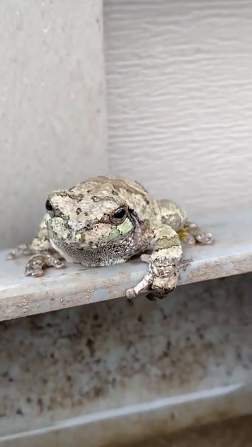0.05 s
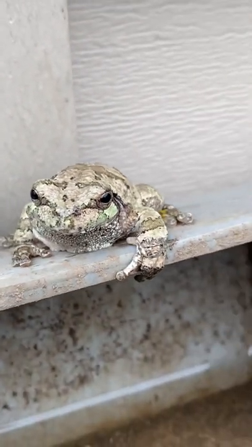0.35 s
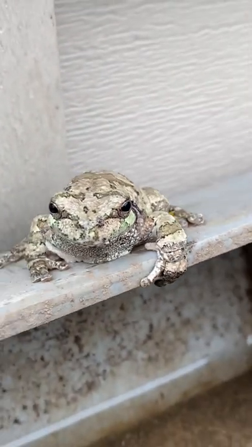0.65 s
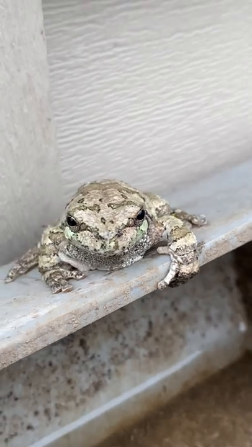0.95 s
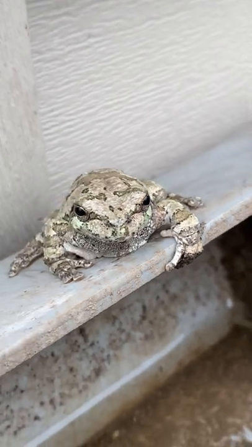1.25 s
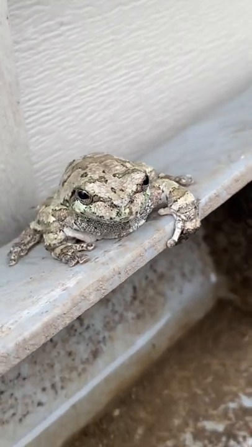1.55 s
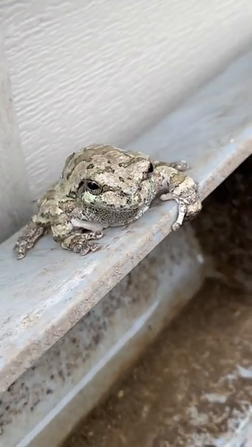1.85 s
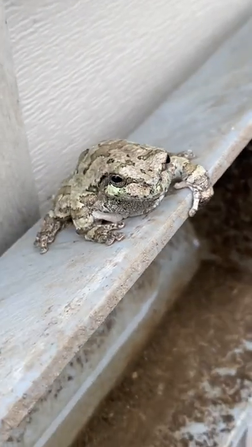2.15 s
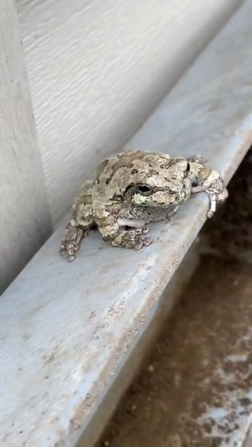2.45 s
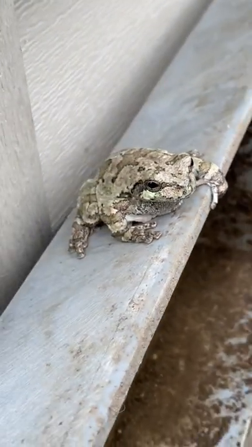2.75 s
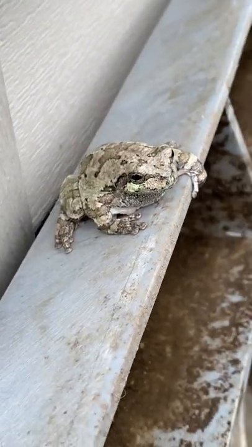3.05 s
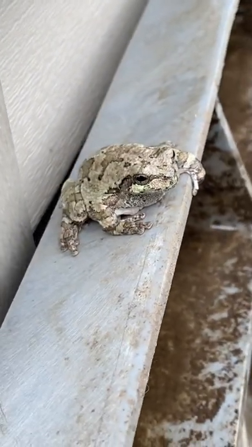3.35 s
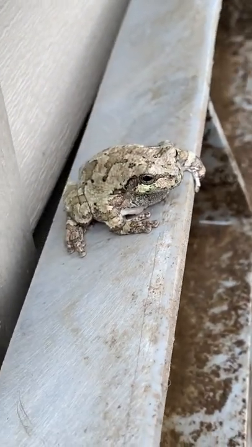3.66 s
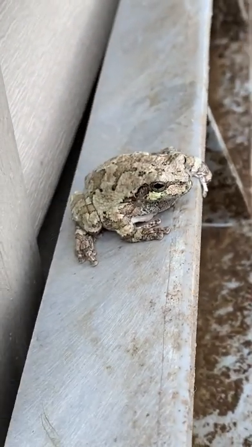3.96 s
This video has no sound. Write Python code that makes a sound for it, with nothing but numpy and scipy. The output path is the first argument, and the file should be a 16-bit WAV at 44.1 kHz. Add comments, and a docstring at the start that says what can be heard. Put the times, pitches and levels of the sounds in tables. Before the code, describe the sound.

Rapid bird chirps and whistles over low rumble and light wind, then faint cloth rustling.

```python
"""Outdoors beside a house wall, over a steady low rumble and light wind. A small bird opens with a rapid
trill of falling chirps, then alternates arched slurs with high whistles, all gliding sine tones that
bounce off nearby surfaces. Farther birds call behind the trill, with faint ticks close by. After about a
second the song ends, leaving distant calls and twitter. A soft, clothing-like rustle at the microphone
swells to one firm rub near 1.7 s and fades around 3 s; a few small taps and a tick follow."""
import sys
import numpy as np
from scipy import signal
from scipy.fft import rfft, irfft, next_fast_len
from scipy.io import wavfile
from scipy.ndimage import uniform_filter1d, map_coordinates

SR = 44100
rng = np.random.default_rng(int(sys.argv[2]) if len(sys.argv) > 2 else 0)


def output_pcm(signal):
    """Save a mono or channel-first signal as 16-bit PCM at the path in sys.argv[1].

    Samples are clipped to [-1, 1] before scaling.
    """
    pcm = np.clip(np.atleast_2d(signal).T, -1, 1) * 32767
    wavfile.write(sys.argv[1], SR, np.round(pcm).astype(np.int16))


N = 176400
PREROLL = SR // 4  # samples ahead of the start, so the first chirp can begin early

# Levels in the tables are relative; each layer sets its own trim.
# chirps of the trill (time of peak [s], level [dB])
TRILL_CUES = [(.002, -44.5), (.075, -45.5), (0.1463, -45.5), (0.219, -45), (.29, -44.5), (.36, -44),
              (.432, -45), (.506, -46), (0.5828, -46.5)]
# one chirp, a steep fall and a separate low tail (time [ms], pitch [ratio to loudest point], level [dB])
CHIRP_SHAPE = [(0, 1.24, -26), (7.44, 1.28, -17), (11.2, 1.13, -11), (15.52, 1, 0), (19.33, .85, -8.5),
               (25.8, .77, -33), (32.2, .715, -12), (39.1, .71, -15.5), (44.9, 0.656, -11.5)]
# arched slurs (time [s], length [s], level [dB], top pitch [Hz])
SLUR_CUES = [(0.645, 0.073, -56.5, 3705), (0.792, 0.066, -56, 3640), (0.941, 0.063, -56, 3580)]
# one slur, an arch that breaks at the top (position [0-1], pitch [ratio to top], level [dB])
SLUR_SHAPE = [(0, 0.95, -4.5), (.16, .87, -1), (.36, 0.91, 1.5), (.6, 1, -15), (.78, 1, -2.5), (1, 0.76, 0)]
# high whistles after the slurs (time [s], length [s], level [dB], pitch [Hz])
WHISTLE_CUES = [(0.73, 0.039, -54, 4707), (0.873, 0.048, -60, 4580), (1.02, 0.0407, -57, 4340)]
# one whistle (position [0-1], pitch [ratio], level [dB])
WHISTLE_SHAPE = [(0, 0.91, -20.5), (.33, 1, -6), (.46, 0.98, 5), (1, 1, -4)]
# early reflections of the song off nearby surfaces (delay [ms], level [dB])
REFLECTIONS = [(2.2, -18), (5.9, -5), (15.5, -13), (36, -10.5)]
# steady calls of farther birds (time [s], length [s], level [dB], pitch [Hz])
FAR_CUES = [(0, 0.17, -63, 2507), (0.193, .055, -68, 2050), (1.658, 0.12, -74, 3010),
            (2.338, 0.05, -74.5, 2775), (2.63, 0.11, -76.5, 2490), (2.928, 0.12, -74, 2630),
            (3.263, 0.21, -84, 3770)]
# bouts of very distant twitter (start [s], end [s], level [dB], top pitch [Hz])
TWITTER_BOUTS = [(1.049, 1.7, -79.5, 3310), (2.028, 2.58, -82.5, 5000), (2.049, 3.1, -79.5, 2780),
                 (3.682, 4.0, -85, 3550)]
# fader moves of the rustle (time [s], body level [dB], treble level [dB])
RUSTLE_FADERS = [(0, -84, -84), (.3, -86.5, -89), (.7, -79, -80), (1.3, -81.5, -90), (1.45, -79, -81.5),
                 (1.58, -88.5, -103), (1.72, -77, -93.5), (1.86, -70, -80), (1.97, -75, -97),
                 (2.3, -74.5, -100), (2.85, -77, -102), (2.93, -84, -104), (4, -106, -103)]
# colours of the cloth's body, its treble and the hollow firm rub (frequency [Hz], level [dB])
BODY_EQ = [(130, -43), (450, 5), (1150, 4), (1700, 0), (2500, 1.5), (3600, -10), (6500, -27.5)]
TREBLE_EQ = [(2000, -2.5), (4500, 0), (11000, 3.5), (13500, -15)]
RUB_EQ = [(300, -5.5), (980, 6.5), (1400, -10), (1800, 2), (2600, -12.5), (4400, -10), (6500, -31)]
# crisp close ticks and duller handling taps (time [s], level [dB])
TICK_CUES = [(.103, -63.5), (.133, -67), (.168, -69.5), (.345, -67.5), (.429, -70), (.506, -72),
             (.765, -79), (.898, -78), (3.851, -78.5)]
TAP_CUES = [(1.698, -63.5), (1.836, -57), (2.803, -69), (2.978, -63), (3.688, -74.5), (3.934, -69.5)]
# soft low handling bumps (time [s], level [dB], centre [Hz])
BUMP_CUES = [(.42, -56.5, 155), (1.412, -57, 128)]
# colours of the rumble and the wind (frequency [Hz], level [dB])
RUMBLE_EQ = [(15, -50.5), (26, -19.5), (48, -1.5), (72, -0.5), (155, -13.5), (215, -21.5), (600, -38.5),
             (1200, -68)]
WIND_EQ = [(150, -26.5), (700, 6.5), (3500, -1.5), (7000, -9), (13500, -9.5)]
# stereo image of the rumble, and of wind and cloth (frequency [Hz], left-right correlation [-1 to 1])
RUMBLE_IMAGE = [(70, .9997), (125, .98), (250, .72), (500, .1)]
AIRY_IMAGE = [(500, -0.35), (1100, -0.32), (2500, 1), (10000, 0.6)]
# the microphone's treble notch (frequency [Hz], gain [dB])
MIC_EQ = [(5700, 0), (6400, -6), (7000, -21.5), (7700, -18), (8700, -1)]


def songbird():
    """The lead voice: direct song, slaps off nearby surfaces, and a short and a long yard reverb."""
    song = trill() + np.pad(flourish(), (PREROLL, 0))
    close = np.array([song, song])
    for ms, db in REFLECTIONS:
        add(close, ms / 1000, amp(db) * song)
    short_tail = amp(-9.5) * yard(song, t60=.29, width=.29)
    long_tail = amp(-11) * yard(song, t60=.96, width=.16)
    return (amp(-6) * close + short_tail + long_tail)[:, PREROLL:]


def trill(lead_s=.0155, chirp_hz=4320):
    """Steeply falling chirps, about fourteen a second; stronger ones have a fuller, hoarse lead-in."""
    out, loudest = np.zeros(PREROLL + N), max(db for _, db in TRILL_CUES)
    for s, db in TRILL_CUES:
        chirp = note(CHIRP_SHAPE, CHIRP_SHAPE[-1][0] / 1000, chirp_hz, waver=.035, rate=1100)
        lead_in = np.clip(2 * (1 - np.arange(len(chirp)) / SR / lead_s), 0, 1)  # gone by the peak
        duck_db = 2.4 * (db - loudest)
        hoarse_db = 4 * wobble(500, len(chirp))
        add(out, PREROLL / SR + s - lead_s, amp(db + lead_in * (duck_db + hoarse_db)) * chirp)
    return out


def flourish():
    """Arched slurs trade off with short high whistles."""
    out = np.zeros(N)
    for s, length, db, hz in SLUR_CUES:
        add(out, s, amp(db) * note(SLUR_SHAPE, length, hz, waver=.028, rate=500))
    for s, length, db, hz in WHISTLE_CUES:
        add(out, s, amp(db) * note(WHISTLE_SHAPE, length, hz, waver=.026, rate=500))
    return amp(-1) * out


def far_birds():
    """Plain whistles; the fainter a bird, the farther it is and the wetter it sounds."""
    send, direct = np.zeros((2, N))
    nearest_db = max(db for _, _, db, _ in FAR_CUES)
    for s, length, db, hz in FAR_CUES:
        call = amp(db) * note([(0, 1, 0), (1, 1, -2)], length, hz, waver=.009)
        add(send, s, call)
        add(direct, s, amp((db - nearest_db) / 2) * call)
    return direct + amp(-3) * yard(send, t60=1.0, width=.23)


def twitter(notes_per_s=18, pitch_spread=.06):
    """Quick random slurs from far away, arriving only as reverb."""
    send, step = np.zeros(N), 1 / notes_per_s
    for start, end, db, hz in TWITTER_BOUTS:
        for s in np.arange(start, end, step):
            detune, accent = rng.standard_normal(2)
            slur = note(SLUR_SHAPE, step, hz * (1 + pitch_spread * detune), waver=.03)
            add(send, s, amp(db + 2 * accent) * slur)
    return amp(1) * yard(send, t60=.34, width=.14)


def rustle(rub_at_s=1.694, rub_length_s=.2164, attack_s=.0025, release_s=.03):
    """Soft, grainy rubbing of cloth, a little to the left, with one firm rub that catches abruptly."""
    t = np.arange(N) / SR
    times, *faders = np.transpose(RUSTLE_FADERS)
    body_gain, treble_gain = [amp(np.interp(t, times, db) + 4.5) for db in faders]
    age = t - rub_at_s
    rub_gain = amp(-61.5) * np.clip(np.minimum(age / attack_s, 1 + (rub_length_s - age) / release_s), 0, 1)
    grain = unit(amp(1.73 * wobble(220) + wobble(24.9)))
    body, treble, rub = [noise_bed(eq, AIRY_IMAGE, patchy_db=1.2) for eq in (BODY_EQ, TREBLE_EQ, RUB_EQ)]
    pan_left = amp([[1.5], [-1.5]])
    return grain * (pan_left * (body_gain * body + rub_gain * rub) + treble_gain * treble)


def contacts(cues, hz, t60):
    """Tiny dry contacts, each a grainy puff of noise in one broad band."""
    out, t = np.zeros((2, N)), np.arange(SR // 10) / SR
    band = signal.butter(2, [hz / 1.5, hz * 1.5], "band", fs=SR, output="sos")
    for s, db in cues:
        mid, side = unit(signal.sosfilt(band, rng.standard_normal((2, len(t)))))
        gain = amp(db - 60 * t / t60 + 2 * wobble(510, len(t)))
        add(out, s, gain * stereo(mid, .5 * side))
    return out


def bumps(t60=.35):
    """Dull handling knocks: narrow-band noise with a soft attack."""
    out, t = np.zeros(N), np.arange(SR // 2) / SR
    for s, db, hz in BUMP_CUES:
        b, a = signal.iirpeak(hz, Q=2, fs=SR)
        thud = unit(signal.lfilter(b, a, signal.lfilter(b, a, rng.standard_normal(len(t)))))
        add(out, s, amp(db + 3.5 - 60 * t / t60) * thud)
    return out


def background(drone_hz=63.73):
    """The bed: low rumble with a wavering drone in it, and a faint, even hiss of wind."""
    rumble = amp(-50.5 + .94 * wobble(11)) * noise_bed(RUMBLE_EQ, RUMBLE_IMAGE, patchy_db=2.04)
    phase = 2 * np.pi * drone_hz * np.arange(N) / SR + .65 * wobble(9)
    drone = amp(-55.5) * unit(amp(3.7 * wobble(6.3)) * np.sin(phase))
    wind = amp(-80.5) * noise_bed(WIND_EQ, AIRY_IMAGE, patchy_db=.4)
    return rumble + drone + wind


def note(shape, length, hz, waver, rate=300):
    """A whistled sine riding a pitch and level shape; its pitch jitters at rate turns a second."""
    position, ratio, db = np.transpose(shape)
    position = position / position[-1]
    progress = np.linspace(0, 1, int(length * SR))
    pitch = hz * np.interp(progress, position, ratio) * (1 + waver * wobble(rate, len(progress)))
    gain = amp(np.interp(progress, position, db)) * signal.windows.tukey(len(progress), .1)
    return np.sqrt(2) * gain * np.sin(2 * np.pi * np.cumsum(pitch) / SR)


def yard(x, t60, width):
    """Diffuse, nearly mono reverb off trees and buildings, falling 60 dB in t60 seconds."""
    t = np.arange(SR) / SR
    mid, side = rng.standard_normal((2, SR)) * amp(-60 * t / t60) * (1 - np.exp(-t / .0031))
    tail = stereo(mid, width * side)
    return signal.fftconvolve(x[None], tail / np.linalg.norm(tail[0]), axes=1)[:, :len(x)]


def noise_bed(eq, image, patchy_db):
    """Coloured stereo noise at rms 1, its level mottled across time and frequency."""
    spectra = signal.stft(rng.standard_normal((2, N)), nperseg=512)[2]
    patches = uniform_filter1d(rng.standard_normal(spectra.shape[1:]), size=4, axis=0)
    patches = uniform_filter1d(patches, size=22, axis=1)
    pair = signal.istft(spectra * amp(patchy_db * unit(patches)), nperseg=512)[1][:, :N]

    def mid_side_gains(hz):
        angle = np.arccos(np.clip(curve(image, hz), -1, 1)) / 2
        return amp(curve(eq, hz)) * [np.cos(angle), np.sin(angle)]

    return unit(stereo(*filtered(pair, mid_side_gains)))


def amp(db):
    return 10 ** (np.asarray(db) / 20)


def unit(x):
    return x / np.sqrt(np.mean(x ** 2) + 1e-20)


def stereo(mid, side):
    return np.array([mid + side, mid - side])


def curve(points, hz):
    """Read breakpoints along a log frequency axis."""
    freqs, values = np.transpose(points)
    return np.interp(np.log(hz + 1), np.log(freqs + 1), values)


def wobble(rate, size=N):
    """A smooth random modulator, rate turns a second."""
    return map_coordinates(rng.standard_normal(int(N * rate / SR) + 4), [np.arange(size) * rate / SR])


def filtered(x, response):
    """Apply a frequency response."""
    size = next_fast_len(N + SR // 2)
    return irfft(rfft(x, size) * response(np.fft.rfftfreq(size, 1 / SR)), size)[..., :N]


def add(track, s, sound):
    """Mix a sound into a track at s seconds."""
    start = max(round(s * SR), 0)
    part = sound[..., :track.shape[-1] - start]
    track[..., start:start + part.shape[-1]] += part


def scene():
    """The mix: birds near and far, close handling noise and the outdoor bed."""
    cloth = rustle()
    ticks = contacts(TICK_CUES, hz=8150, t60=.14)
    taps = contacts(TAP_CUES, hz=1960, t60=.028)
    handling = cloth + ticks + taps + bumps()
    return songbird() + far_birds() + twitter() + handling + background()


def record(dry):
    """A two-port microphone with a treble notch and a band limit; the right port hears slightly later."""
    port_lag_s, top_hz = 22e-6, 12700
    ports = lambda hz: np.exp(1j * np.pi * hz * port_lag_s * np.array([[1], [-1]]))
    return filtered(dry, lambda hz: ports(hz) * amp(curve(MIC_EQ, hz)) * (hz < top_hz))


dry = scene()
out = record(dry)
output_pcm(out)
```